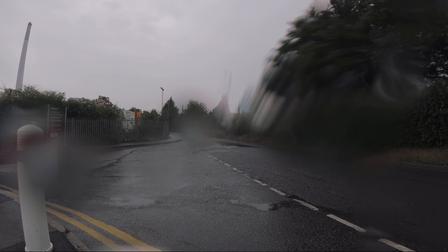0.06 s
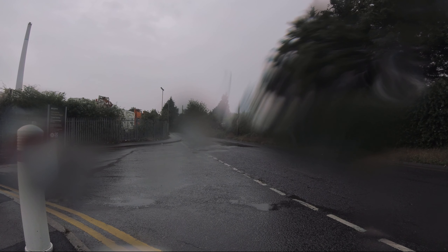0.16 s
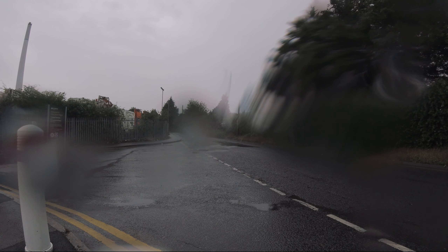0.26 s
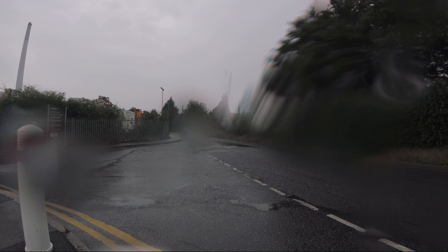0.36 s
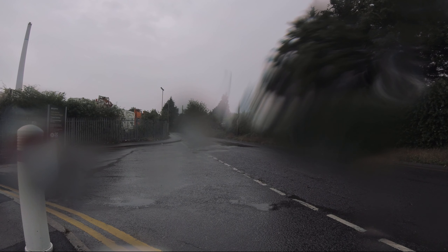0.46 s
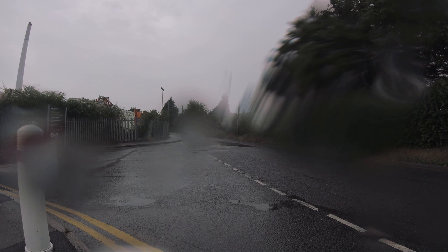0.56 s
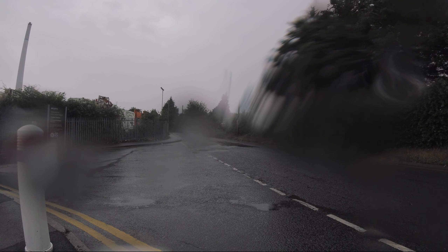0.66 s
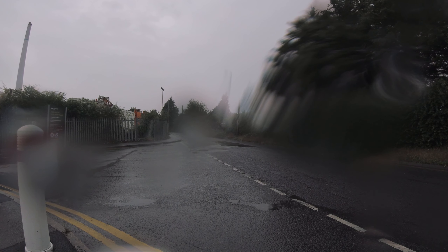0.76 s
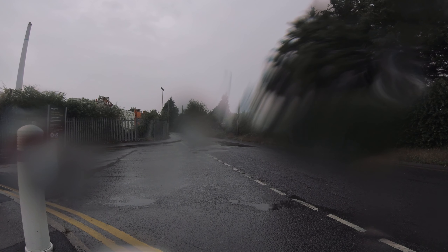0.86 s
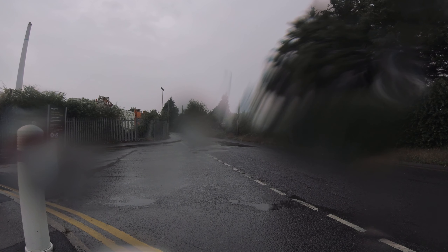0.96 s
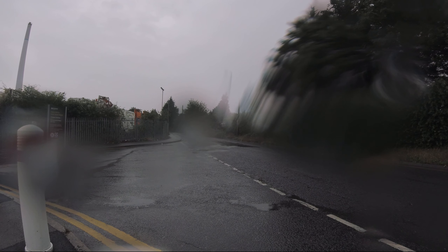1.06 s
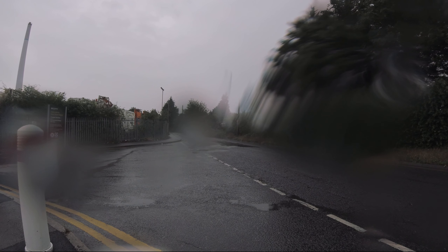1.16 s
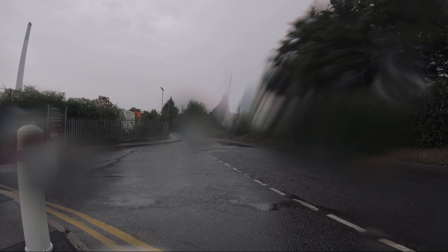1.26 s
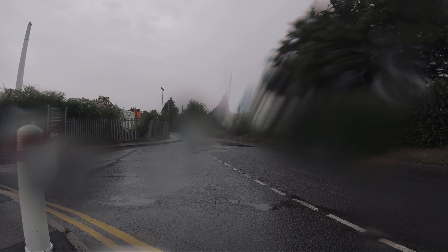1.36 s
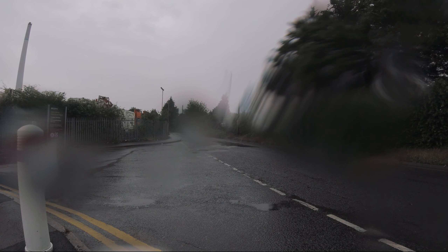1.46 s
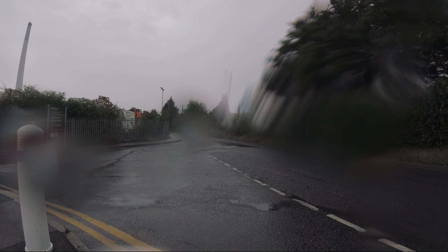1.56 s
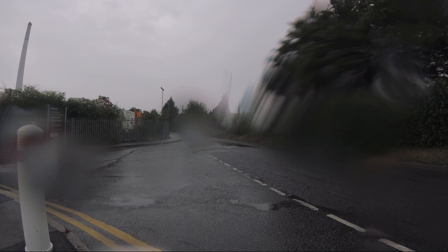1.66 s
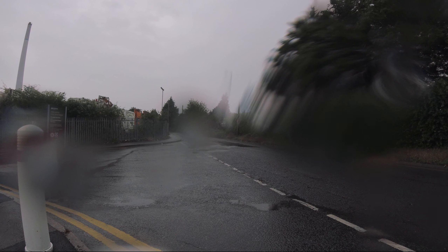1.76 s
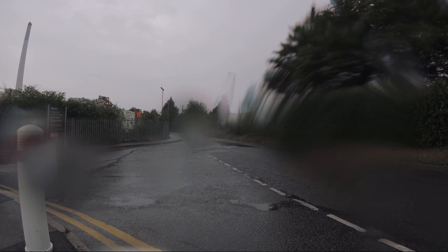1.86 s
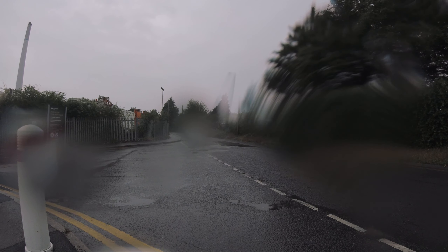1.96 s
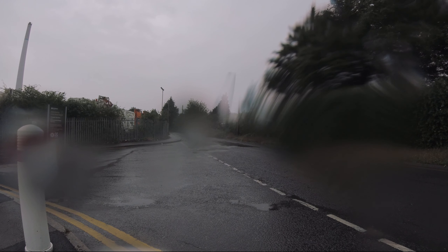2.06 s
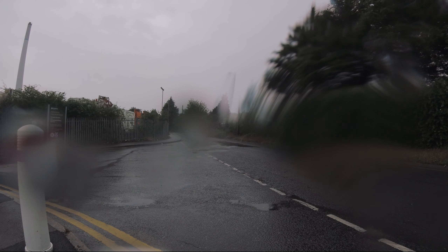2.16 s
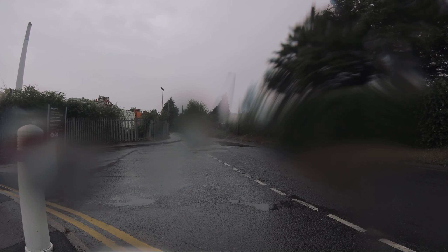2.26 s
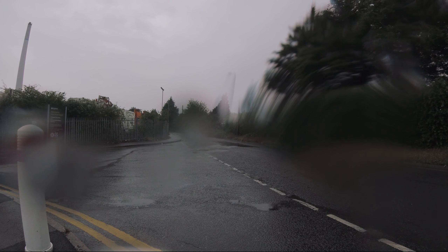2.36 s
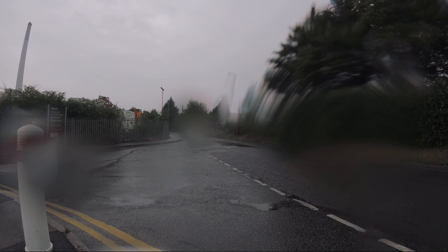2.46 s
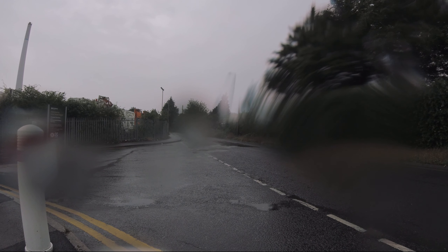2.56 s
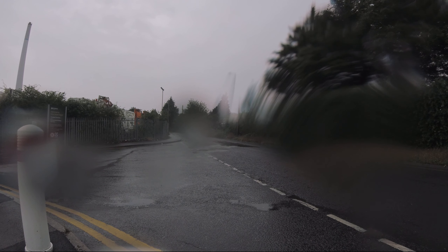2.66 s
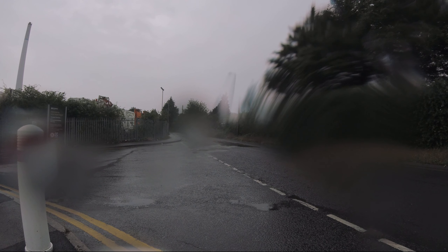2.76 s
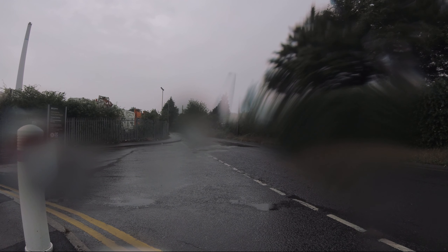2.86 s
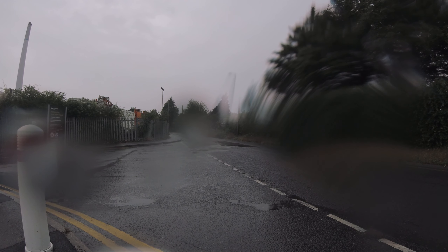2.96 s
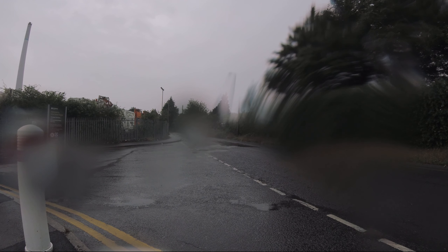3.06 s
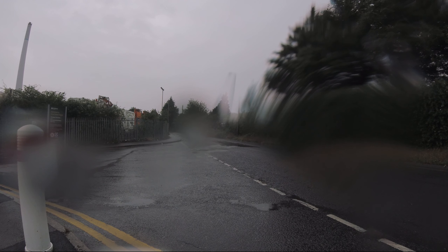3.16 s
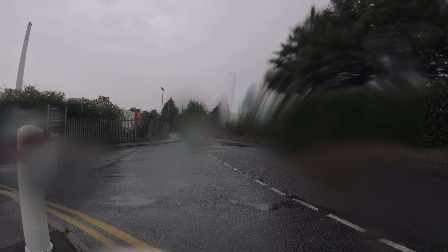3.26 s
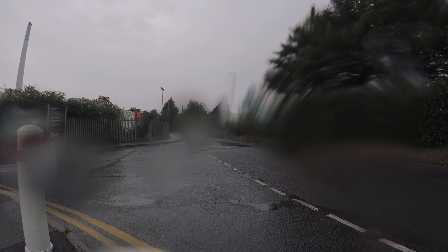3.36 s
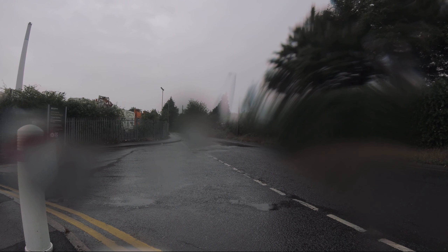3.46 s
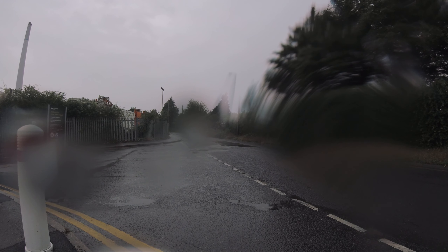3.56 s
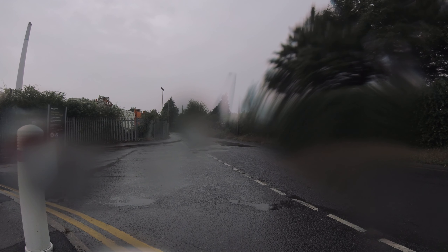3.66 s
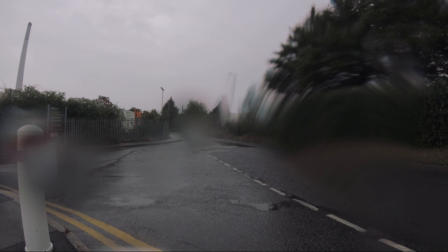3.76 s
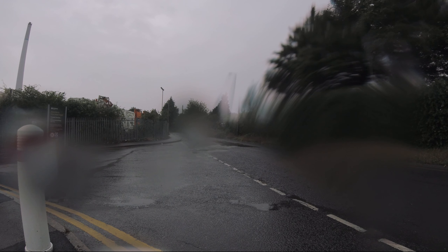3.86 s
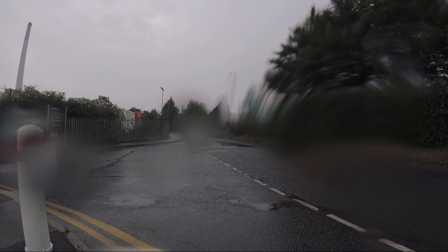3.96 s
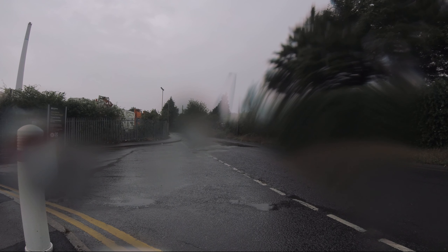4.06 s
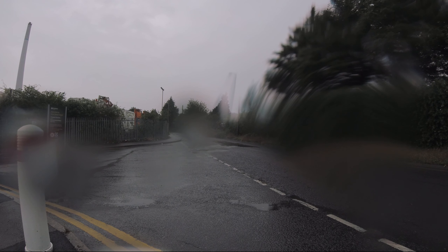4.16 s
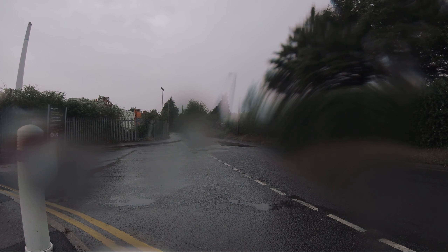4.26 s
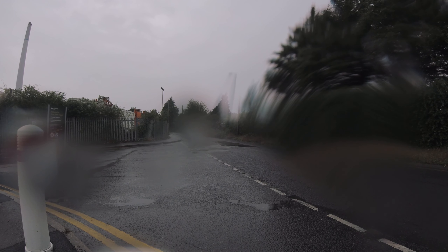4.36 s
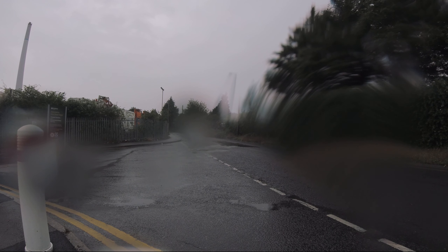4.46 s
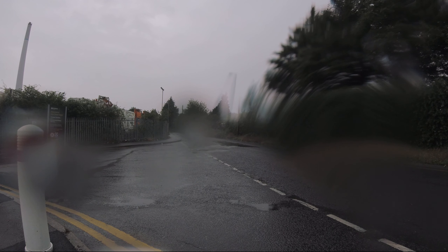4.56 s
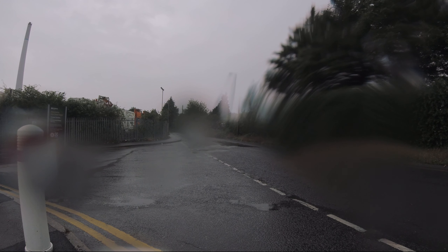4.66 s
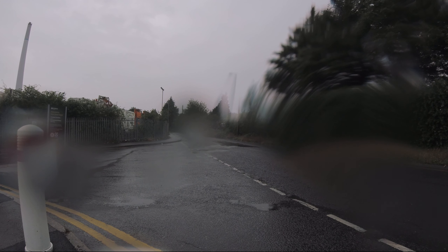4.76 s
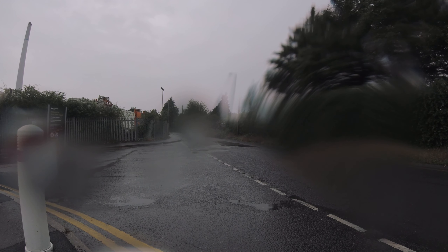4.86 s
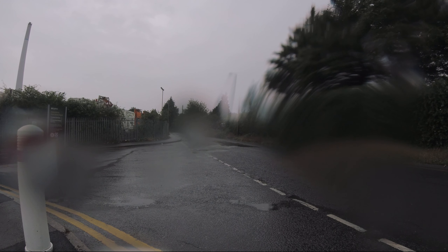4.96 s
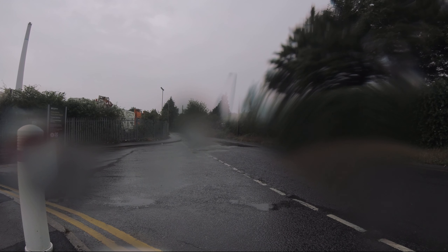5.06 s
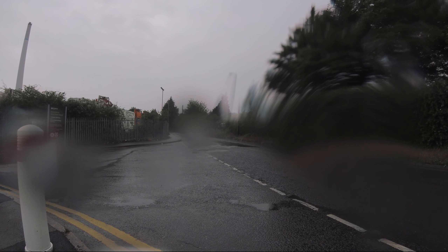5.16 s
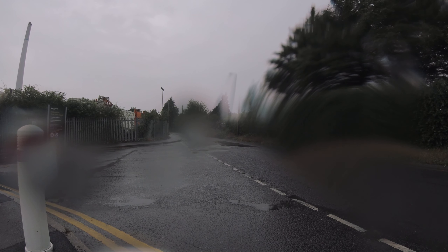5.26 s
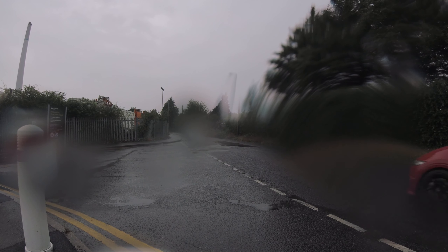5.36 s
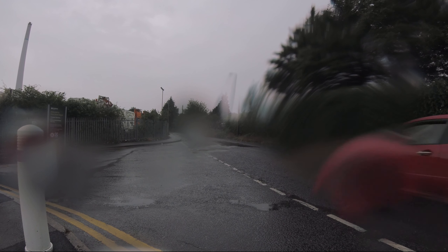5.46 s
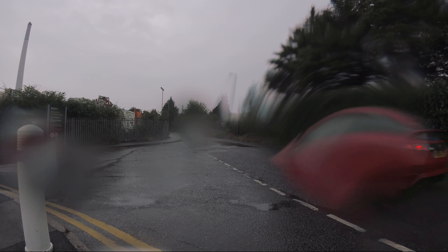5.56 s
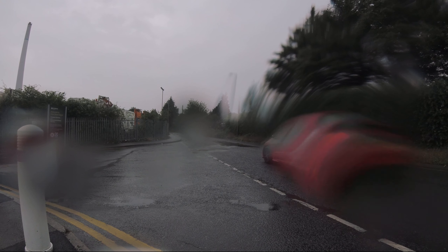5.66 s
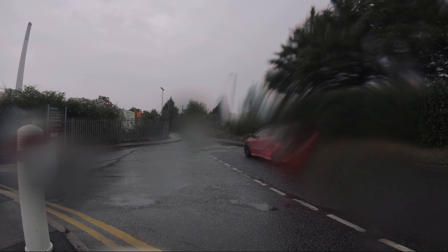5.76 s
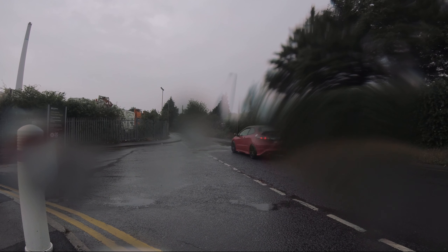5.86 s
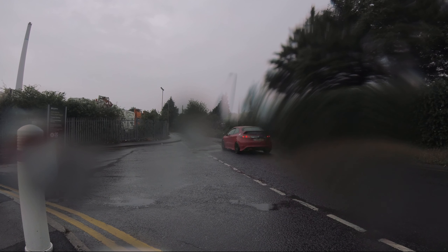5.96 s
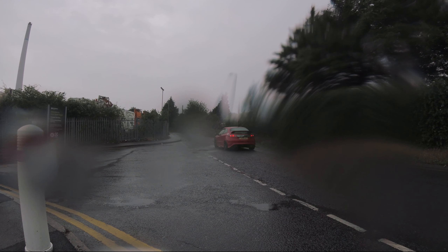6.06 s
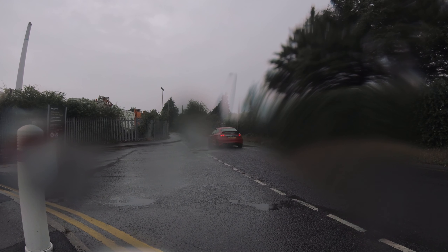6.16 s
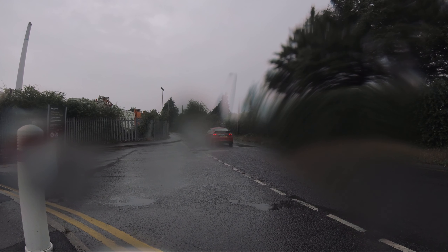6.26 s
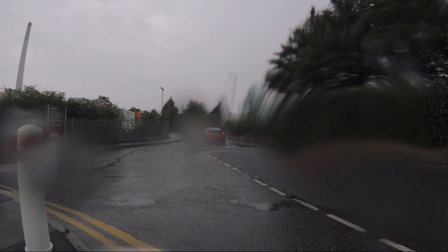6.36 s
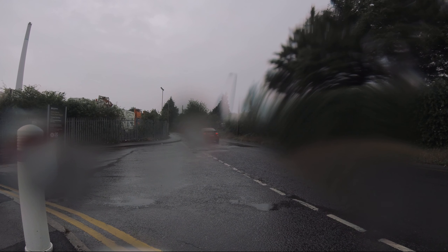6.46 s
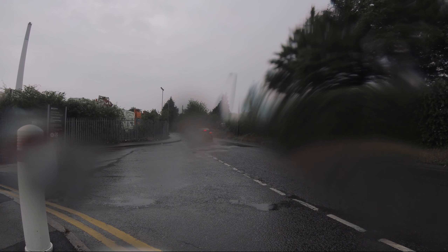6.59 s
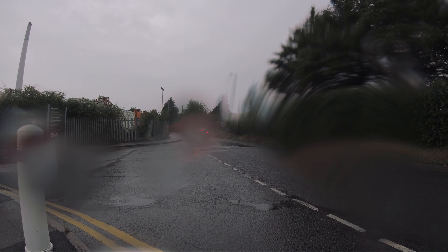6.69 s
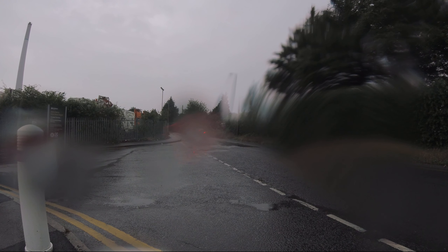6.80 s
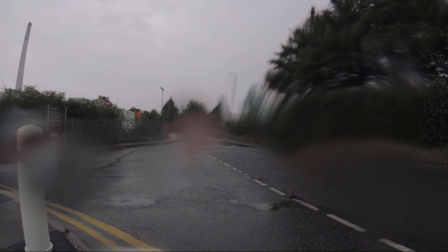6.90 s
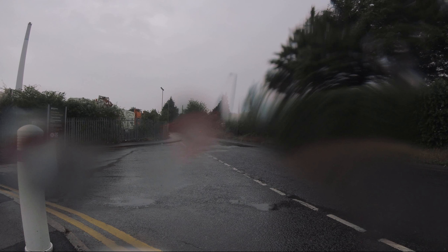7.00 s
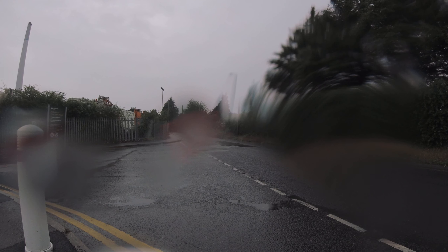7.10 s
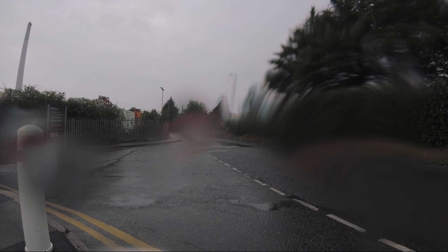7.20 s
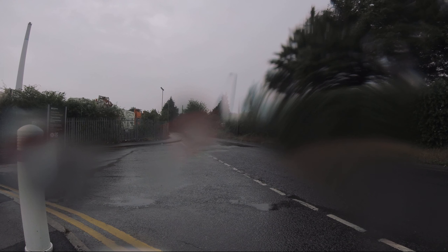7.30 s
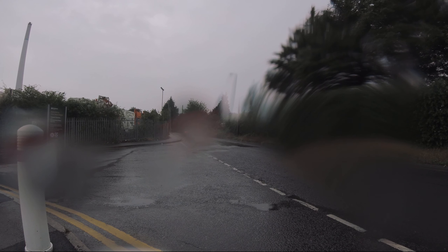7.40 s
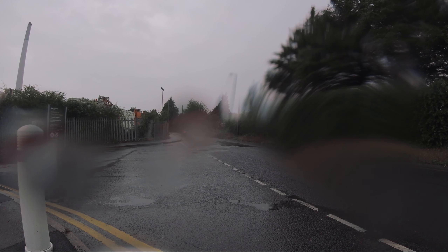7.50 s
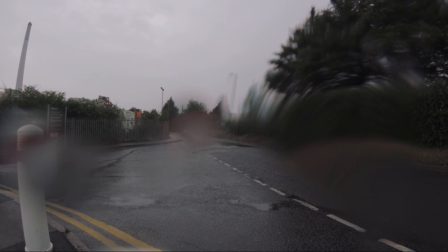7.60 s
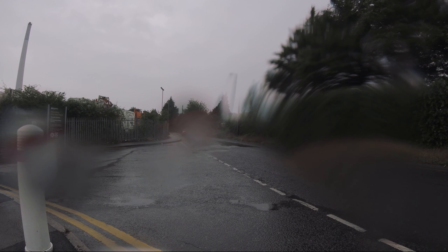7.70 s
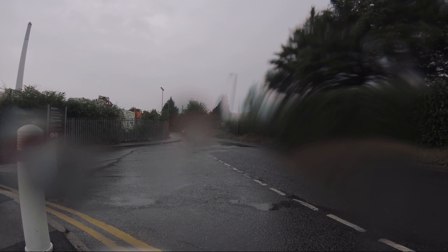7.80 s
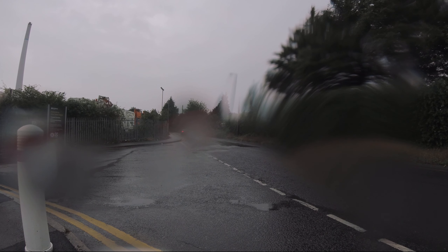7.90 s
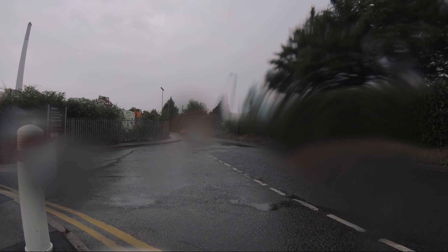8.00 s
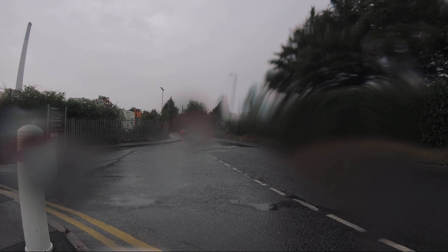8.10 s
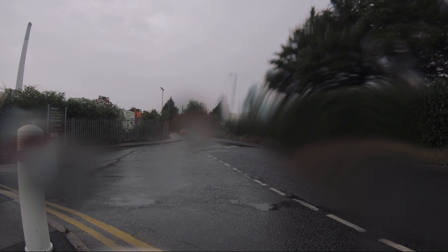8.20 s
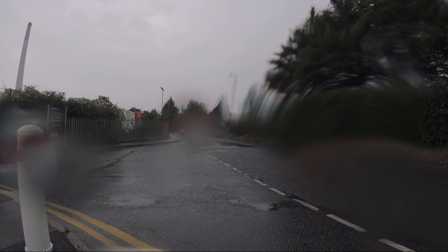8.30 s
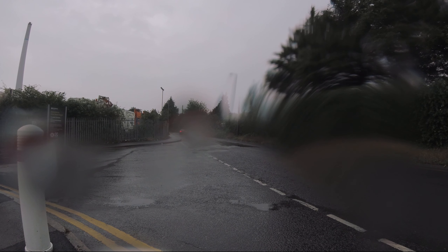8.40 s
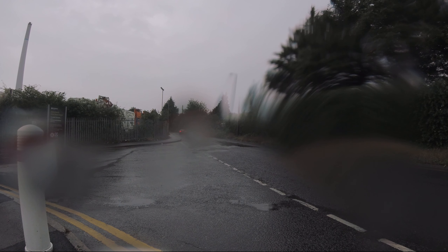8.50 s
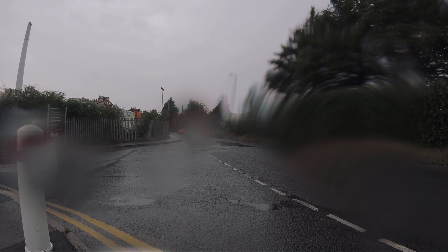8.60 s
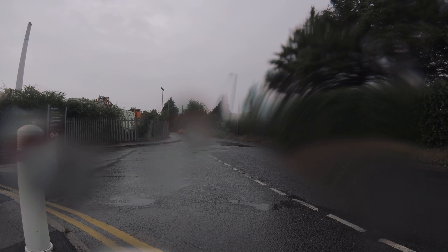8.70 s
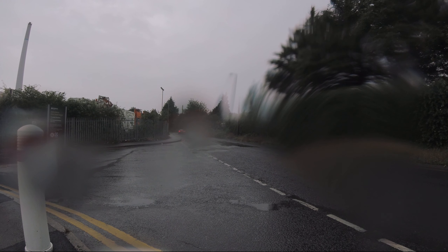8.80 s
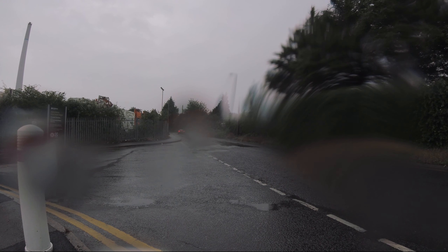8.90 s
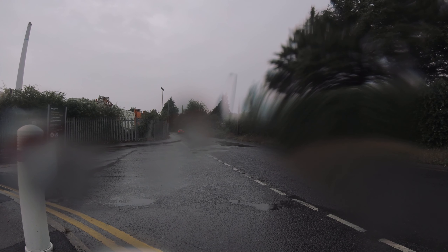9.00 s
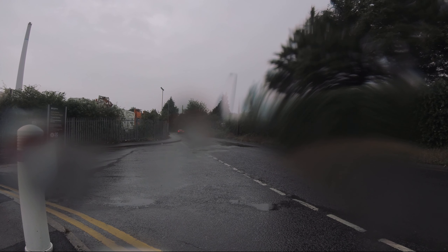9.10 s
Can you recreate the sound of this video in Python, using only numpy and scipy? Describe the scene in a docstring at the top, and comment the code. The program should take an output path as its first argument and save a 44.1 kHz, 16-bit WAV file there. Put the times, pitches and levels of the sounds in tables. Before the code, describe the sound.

A loud four-cylinder car accelerates along a wet road, passes close with tyre hiss and spray, then fades away as raindrops tick on the microphone.

```python
"""A four-cylinder car with a loud exhaust pulls up through its gears on a wet road, passes close, lifts off far away.
Its exhaust note is a set of sines on multiples of the firing rate, with rung tailpipe blows and scattered echoes.
Filtered noise makes the tyre roar, gas rasp and water spray of the road, and the rumble of wind at the microphone.
At first a slower engine drones low, also made of sines; short decaying sines are rain drops ticking on the housing."""
import sys
import numpy as np
from scipy import signal
from scipy.fft import rfft, irfft
from scipy.io import wavfile
from scipy.ndimage import uniform_filter1d

SR = 44100
rng = np.random.default_rng(int(sys.argv[2]) if len(sys.argv) > 2 else 0)


def master_out(mix):
    """Clip the mix to full scale and print it as 16-bit PCM to the path in sys.argv[1]."""
    frames = np.transpose(np.atleast_2d(mix))
    ceiling = np.clip(frames, -1, 1)
    pcm = np.round(ceiling * 32767).astype(np.int16)
    wavfile.write(sys.argv[1], SR, pcm)


def level_to_linear(level):
    """Convert decibel levels to linear amplitude factors, elementwise."""
    exponent = np.asarray(level, float) / 20
    return 10 ** exponent


N = 403074  # length in samples
t = np.arange(N) / SR  # time in seconds

# the car in its upper gear; snarl is how hard the pipe is driven and how near it is:
# t/s, firing rate/Hz, firing tone/dB, snarl/dB
CAR = [(2.1, 114.3, -40.5, -9.5), (2.3, 127.2, -31.5, -19), (2.45, 144.1, -20.5, -14.5),
       (2.65, 158.6, -13.5, -6), (2.86, 180.5, -7, -1), (3.06, 195.8, -9, -5.5), (3.14, 205, -20, -7),
       (3.3, 218.4, -12.5, -15), (3.43, 228.4, -9.5, -11), (3.55, 212.5, -7.5, -17.5),
       (3.68, 223.8, -8.5, -20), (3.86, 213.8, -13, -13), (3.96, 193, -8.5, -11.5), (4.05, 189.2, -7.5, 1),
       (4.3, 190.1, -9.5, 0), (4.55, 192.8, -6.5, 2.5), (4.78, 210.5, -10, -0.5), (4.89, 220.7, -6, 0.5),
       (4.935, 205.2, -9.5, 5), (5.0, 199.1, -11, 6.5), (5.12, 212.3, -8, -2.5), (5.29, 225.3, -6, -2),
       (5.34, 214.9, -5.5, -2.5), (5.55, 215.1, -5.5, -2), (5.85, 215.2, -4, -8.5), (6.08, 227, -8, -9),
       (6.22, 225, -8, -6.5), (6.32, 244.4, -12.5, -6), (6.5, 247, -13, -6.5), (6.6, 228.5, -18, -20),
       (6.95, 224.5, -13, -15.5), (7.16, 204.5, -17, -17.5), (7.58, 197.5, -12.5, -21),
       (8.03, 171.5, -16, -23), (8.3, 165.4, -9.5, -25.5), (8.62, 158, -11, -19), (9.0, 150.5, -16, -18.5),
       (9.14, 145, -24.5, -16)]
PASSING_S = 0.08  # how gradually the sound changes as the car arrives and passes


def curves(table):
    """Fade that is silent outside the table's time span, and the table's columns with one value a sample."""
    s, *columns = np.transpose(table)
    inside = np.minimum(t - s[0], s[-1] + 0.02 - t) / 0.02
    starts_at_once = s[0] < 0.01
    edge = np.clip(inside + starts_at_once, 0, 1)
    return edge, [np.interp(t, s, column) for column in columns]


def unit(x):
    """Scale to an rms of 1."""
    return x / np.sqrt(np.mean(x ** 2))


def walk(rate):
    """Wandering random values: each is held for 1 / rate seconds, then the steps are smoothed twice."""
    hold = int(SR / rate)
    stairs = np.repeat(rng.standard_normal(N // hold + 1), hold)
    return 1.3 * uniform_filter1d(uniform_filter1d(stairs, hold), hold)[:N]  # spread near 1


def smooth_step(s, length):
    """Smooth rise from 0 to 1 around s."""
    return 0.5 + 0.5 * np.tanh((t - s) / length)


def bumps(events):
    """Sum of short bell-shaped swells in dB from (s, dB, length s) rows."""
    return sum(db * np.exp(-((t - s) / length) ** 2) for s, db, length in events)


def band(lo_hz, hi_hz, order=2):
    """Noise between two edges, rms 1."""
    sos = signal.butter(order, [lo_hz, hi_hz], "bandpass", fs=SR, output="sos")
    return unit(signal.sosfilt(sos, rng.standard_normal(N)))


def coloured(spectrum, grain_db=0):
    """Noise shaped to a (Hz, dB) spectrum, rms 1; with grain, a few samples stand out as droplets."""
    hz, db = np.transpose(spectrum)
    bins = np.arange(1, N // 2 + 2) * SR / N
    noise = rng.standard_normal(N) * level_to_linear(grain_db * rng.exponential(size=N))
    gain = level_to_linear(np.interp(np.log(bins), np.log(hz), db))
    return unit(irfft(rfft(noise) * gain, N))


def engine(hz, orders, jitter, waver_db, side_waver_db):
    """Sines on multiples of the firing rate; uneven combustion shakes the speed and the level of each."""
    phase = 2 * np.pi * np.cumsum(hz * (1 + jitter * walk(30))) / SR
    tone = 0
    for multiple, db in orders:
        shake_db = (waver_db if multiple == 1 else side_waver_db) * walk(24)
        start = rng.uniform(0, 2 * np.pi)
        tone = tone + np.sqrt(2) * level_to_linear(db + shake_db) * np.cos(multiple * phase + start)
    return tone, phase


def echoes(x, count, first_s, t60_s, level_db):
    """Scattered reflections from fences, hedges and walls; on a gliding note they beat with the direct sound."""
    where, sign = rng.random((count, 2)).T
    lag = first_s + where * t60_s / 2
    taps = np.zeros(int((first_s + t60_s) * SR))
    taps[(lag * SR).astype(int)] = np.sign(sign - 0.5) * level_to_linear(-60 * lag / t60_s)
    taps = taps / np.sqrt(np.sum(taps ** 2))
    return x + level_to_linear(level_db) * signal.fftconvolve(x, taps)[:N]


def drone():
    """A slow, lumpy engine nearby: a few sines whose speed and level waver strongly."""
    # speed and level: t/s, firing rate/Hz, level/dB
    drone_course = [(0.0, 35.66, -19), (0.284, 40.45, -14.5), (0.58, 42.05, -14.5), (1.346, 34.2, -22),
                    (1.86, 35.2, -30.5)]
    # its sines: multiple of the firing rate, level/dB, share of the course's level
    drone_orders = [(1, -0.5, 1), (2, -16.5, 0.83), (4, -16, 1), (5, -14, .85)]
    edge, (hz, level_db) = curves(drone_course)
    orders = [(multiple, db + share * level_db) for multiple, db, share in drone_orders]
    tone, _ = engine(hz, orders, jitter=0.025, waver_db=2.5, side_waver_db=3)
    return edge * tone


def wind():
    """Gusty low noise at the microphone that reaches higher before its bass drops out."""
    # two courses, before and after the bass drops out, each: t/s, level/dB
    wind_courses = [
        [(0.0, -22), (1.238, -24.5), (1.708, -31.5), (1.87, -42)],
        [(1.93, -63), (3.6, -65), (4.0, -53), (4.45, -60), (4.7, -38), (4.96, -28), (5.3, -37.5), (5.94, -45.5),
         (7.45, -35), (8.11, -45), (9.14, -49)],
    ]
    (_, (early_db,)), (_, (late_db,)) = (curves(course) for course in wind_courses)
    early = t < 1.885
    gusts = level_to_linear(np.where(early, early_db, late_db) + 2 * walk(10))
    early_rumble = band(18.5, 104) + level_to_linear(-10.5) * band(125, 290, order=3)
    late_rumble = band(14, 125)
    return gusts * np.where(early, early_rumble, late_rumble)


def rain():
    """Each drop is a quickly dying sine of a cycle or two; drizzle adds faint thin ticks by chance."""
    # drops on the housing: t/s, level before decay/dB, pitch/Hz
    drops = [(0.0596, -25.5, 3660), (0.507, -34.5, 2954), (0.53, -24.5, 3242), (0.6105, -30, 3570),
             (0.8684, -27.5, 2840), (0.9837, -28, 3595), (1.1492, -35, 5190), (1.4403, -47, 3300),
             (1.7803, -57, 3094), (2.7288, -37, 3300), (2.7527, -23.5, 4753), (7.186, -27, 3390),
             (7.2946, -30, 3316), (7.3394, -27, 3400), (7.4683, -24.5, 3390), (8.041, -25.5, 3048),
             (8.1424, -27.5, 3110), (8.3106, -35.5, 3080), (8.4761, -29.5, 4610), (8.8508, -45, 2946)]
    out, age = np.zeros(N + 400), np.arange(400) / SR
    for s, db, hz in drops:
        first = int(s * SR)
        out[first:first + 400] += level_to_linear(db) * np.exp(-age / 0.00065) * np.sin(2 * np.pi * hz * age)
    # 18 ticks a second on average
    drizzle = (rng.random(N) < 18 / SR) * level_to_linear(-55 + 4 * rng.exponential(size=N))
    thin = signal.butter(2, [6000, 14000], "bandpass", fs=SR, output="sos")
    return out[:N] + signal.sosfilt(thin, drizzle)


def road(phase, snarl_db):
    """Noise bands: boom, tread roar, gas rasp puffed once a firing, and spray that swishes through puddles."""
    # water thrown up by the tyres: t/s, wetness/dB
    tyres = [(0.0, -12.5), (1.9, -14), (2.44, -11.5), (2.65, -7.5), (2.85, 1), (2.98, -4), (3.21, -1.5),
             (3.61, -3.5), (3.97, -1), (4.1, 2), (4.43, 5), (4.7, 10), (4.86, 11), (5.01, 2), (5.11, 10.5),
             (5.22, 3.5), (5.37, 4), (5.55, -2), (5.67, 2), (5.85, -11), (6.06, -11.5), (6.49, 0),
             (6.62, -10), (7.41, -10), (7.64, -0.5), (8.28, -7), (8.36, -21), (9.14, -16.5)]
    # other traffic, rolling off at first and coming on at the end: t/s, tread roar/dB, brightness/dB
    traffic = [(0.0, -31.5, 2), (0.3, -31.5, 1), (1.25, -40, 2), (1.9, -47, 2.5), (5.5, -45.5, 3.5),
               (6.2, -55, 0.5), (6.9, -37, 6.5), (7.41, -34, 4), (7.52, -36.5, 10), (7.7, -35, -0.5),
               (8.25, -33, 1.5), (8.4, -29.5, 2), (8.7, -28, -4.5), (9.14, -29, -4)]
    # rows boom, roar, rasp, splash, spray, mist: level/dB, share of wetness, share of snarl,
    # gain once past/dB, level against the traffic roar/dB, share of traffic brightness
    road_mix = [(-23.5, 0.11, 0.69, -2.5, -7.5, 1), (-34.5, .6, 0, -3.5, -0.5, 0.097),
                (-39, .8, 0, -6, -17, 0.94), (-44.5, 0.76, 0, -2.5, -20, 1),
                (-45, 0.79, 0.076, 0, -32, 0.16), (-61, 1.1, 0.19, -1, -40, .1)]
    # wheels cut through puddles and the spray swishes up: t/s, rise/dB, length/s
    puddles = [(0.546, 4, 0.042), (.88, 6, 0.034), (1.03, 5, 0.055), (1.372, 8, 0.087), (7.5, 7, 0.026)]
    # colour of the treble hiss: f/Hz, relative level per Hz/dB
    hiss_colour = [(2470, -28), (4200, 8), (4670, 10), (6230, 7.5), (6970, -4.5), (7790, -10.5),
                   (10600, -15), (11900, -22), (13700, -21.5), (15000, -32.5)]
    # colour of the tread roar: f/Hz, relative level per Hz/dB
    tread_colour = [(320, -47.5), (550, -22), (618, 1.5), (695, -3.5), (901, 1), (1030, 5.5), (1170, 2.5),
                    (1550, -0.5), (2400, -23), (3120, -48), (5280, -120)]
    # the mist swells as the car is closest and thins out afterwards: t/s, change/dB, length/s
    mist_swells = [(5.401, 11, 0.34), (7.1, -11.5, 0.45)]

    _, (wet_db,) = curves(tyres)
    _, (traffic_db, bright_db) = curves(traffic)
    snarl_db = snarl_db - 20 * (1 - smooth_step(CAR[0][0], PASSING_S))
    faded = smooth_step(5.72, 0.11)  # the spray falls behind the hedge
    gains = []
    for db, wet, hard, past_db, other_db, bright in road_mix:
        own = level_to_linear(db + wet * wet_db + hard * snarl_db + past_db * faded)
        others = level_to_linear(traffic_db + other_db + bright * bright_db)
        gains.append(np.hypot(own, others))
    boom, roar, rasp, splash, spray, mist = gains
    mist = np.hypot(mist, level_to_linear(-62)) * level_to_linear(bumps(mist_swells))  # with a faint top hiss

    puff = 1 + 0.31 * np.cos(phase) * (t > CAR[0][0])
    swish_db = 0.86 * walk(12) + bumps(puddles)
    hiss = coloured(hiss_colour, grain_db=2.5)
    low_hiss = signal.sosfiltfilt(signal.butter(6, 6900, fs=SR, output="sos"), hiss)
    return (boom * band(130, 489)
            + roar * level_to_linear(0.55 * walk(2.8)) * coloured(tread_colour)
            + rasp * level_to_linear(swish_db / 2 + 1.4 * walk(25)) * unit(puff * band(1576, 2460))
            + splash * level_to_linear(swish_db + 1.4 * walk(13)) * band(2300, 3770)
            + spray * level_to_linear(swish_db + 0.28 * walk(5.8)) * unit(low_hiss)
            + mist * level_to_linear(swish_db / 2 + 0.54 * walk(3.5)) * unit(hiss - low_hiss))


def car():
    """Exhaust note in both gears with echoes, its deepest line, the phase of the firings and the snarl."""
    # end of the lower gear, still ringing round the corner: t/s, firing rate/Hz, level/dB
    low_gear = [(1.3, 225, -37), (1.494, 207.2, -27.5), (1.83, 207.8, -31.5), (1.89, 216.6, -11.5),
                (2.07, 232, -16.5), (2.115, 236.6, -10.5), (2.158, 245.6, -26.5), (2.212, 233.6, -16.5),
                (2.25, 230.6, -32), (2.6, 247, -22.5)]
    # its sines: multiple of the firing rate, level/dB
    low_gear_orders = [(1, -1.5), (.75, -13.5), (1.5, -24), (2, -29.5)]
    # throttle open: from/s, to/s
    throttle_spans = [(2.52, 3.42), (4.0, 6.55)]
    # the firing tone dips briefly: t/s, depth/dB, length/s
    dips = [(2.83, 12, 0.015), (3.56, 11.5, 0.079), (4.48, 9, .02), (4.57, 7, 0.017), (4.65, 4.5, 0.021),
            (5.01, 12, .03), (6.32, 15.5, 0.0075), (6.4, 13, 0.026), (6.55, 12, 0.024), (6.81, 8.5, 0.038),
            (7.125, 14, 0.011), (7.33, 7, 0.037), (7.5, 22, .03), (7.68, 12.5, 0.033), (7.97, 31, 0.013),
            (8.77, 6, 0.024)]
    # sines above and between the firing tone: multiple of the firing rate, level/dB, share of snarl,
    # gain on throttle/dB, further gain on throttle once past/dB
    side_orders = [(.75, -41, 0.27, 9, -0.5), (1.25, -34, 0.42, 9.5, -9.5), (1.5, -43.5, .3, 10.5, -4),
                   (1.75, -40, .7, 10.5, -13.5), (2, -21, 0.78, 5, -2.7), (3, -39, 0.45, 6, 5),
                   (4, -42, .6, 3.5, 2.5)]
    # silencer colour laid over those sines: f/Hz, gain/dB
    silencer = [(130, -6), (165, 7), (200, 9.5), (235, 1), (265, 7), (300, -0.5), (340, -2.5), (400, -1),
                (500, -3), (580, -1), (640, 1), (720, 0.5), (850, 2.5), (980, 1)]
    # all side orders but the second flare as the revs surge: t/s, rise/dB, length/s
    flares = [(2.7, 5.5, .1), (3.3, 7, .1), (4.88, 2, 0.053), (5.13, 9.5, .07)]
    # bark and hollow ring, one row each: level/dB, share of snarl, gain on throttle/dB,
    # further gain on throttle once past/dB
    bark_mix = (-44, .8, 17, -6)
    hollow_mix = (-50, .4, 9, -12)
    # the hollow ring flares as the gas surges: t/s, rise/dB, length/s
    surges = [(2.82, 19.5, 0.11), (4.02, 15.5, 0.036)]
    # half order, one row: level/dB, share of snarl, amount missing before the bass comes back/dB
    half_mix = (-35, 0.7, 26)

    edge, (hz, firing_db, snarl_db) = curves(CAR)
    pedal_s = 0.03
    throttle = sum(smooth_step(a, pedal_s) - smooth_step(b, pedal_s) for a, b in throttle_spans)
    past = throttle * smooth_step(5.32, PASSING_S)
    flare_db = bumps(flares)
    silencer_hz, silencer_db = np.transpose(silencer)

    def mix_db(db, share, open_db, past_db):
        """Level that follows the snarl, the throttle and the passing."""
        return db + share * snarl_db + open_db * throttle + past_db * past

    orders = [(1, firing_db - bumps(dips))]
    for multiple, *row in side_orders:
        colour_db = np.interp(np.log(multiple * hz), np.log(silencer_hz), silencer_db)
        orders.append((multiple, mix_db(*row) + colour_db + (multiple != 2) * flare_db))
    note, phase = engine(hz, orders, jitter=0.006, waver_db=0.9, side_waver_db=3.5)
    note = note + level_to_linear(mix_db(*bark_mix)) * bark(phase, scatter_db=1.5, late_ms=0.05)
    note = note + level_to_linear(mix_db(*hollow_mix) + bumps(surges)) * band(1085, 1150)

    low_edge, (low_hz, low_db) = curves(low_gear)
    low_orders = [(multiple, low_db + db) for multiple, db in low_gear_orders]
    low_note, _ = engine(low_hz, low_orders, jitter=0.012, waver_db=3.5, side_waver_db=3.5)

    db, share, missing_db = half_mix
    half_db = db + share * snarl_db - missing_db * (1 - smooth_step(4.6, 0.15))
    half = edge * level_to_linear(half_db + 2.2 * walk(15)) * np.sqrt(2) * np.cos(phase / 2)
    both_gears = edge * note + low_edge * low_note
    heard = echoes(both_gears, count=120, first_s=0.03, t60_s=1.2, level_db=-14)
    return heard, half, phase, snarl_db


def bark(phase, scatter_db, late_ms):
    """Each firing is a sharp blow, its own size and a little early or late, that rings the tailpipe."""
    # the four firings of a cycle; unequal manifold branches delay two of them: strength/dB, delay/ms
    cylinders = [(0, 0), (-3, .62), (-1, .62), (-5, 0)]
    # tailpipe resonances: f/Hz, width/Hz, level/dB
    pipe = [(480, 29, 0.5), (666, 270, 5), (980, 450, 2.5), (1184, 89, 7), (1220, 180, 2.5),
            (1640, 120, -0.5), (1777, 110, -3), (2740, 650, -18.5)]
    turn = np.arange(1, int(phase[-1] / (2 * np.pi)))
    late, strong = rng.standard_normal((2, len(turn)))
    strength_db, delay_ms = np.array(cylinders)[turn % 4].T
    at = np.interp(2 * np.pi * turn, phase, np.arange(N)) + (delay_ms + late_ms * late) * SR / 1000
    at = np.clip(at, 0, N - 2)
    size = level_to_linear(strength_db + scatter_db * strong)
    # a blow between two samples is shared by both
    whole, part = at.astype(int), at % 1
    blows = np.bincount(whole, size * (1 - part), N) + np.bincount(whole + 1, size * part, N)
    age = np.arange(3000) / SR
    ring = 0
    for k, (hz, width, db) in enumerate(pipe):
        decay = np.exp(-np.pi * width * age)
        ring = ring + (-1) ** k * level_to_linear(db) * width * decay * np.sin(2 * np.pi * hz * age)
    steep = signal.butter(3, 480, "highpass", fs=SR, output="sos")
    return unit(signal.sosfilt(steep, signal.fftconvolve(blows, ring)[:N]))


def scene():
    """Car and road lose their deepest bass; the half order, wind, near engine and rain are added unfiltered."""
    note, half, phase, snarl_db = car()
    low_cut = signal.ellip(6, 0.5, 55, 129.2, "highpass", fs=SR, output="sos")
    car_and_road = signal.sosfilt(low_cut, note + road(phase, snarl_db))
    return (car_and_road + half + drone() + wind() + rain())[None]


def top_cut(x):
    """Nothing passes above the cut-off."""
    return signal.sosfilt(signal.butter(12, 15150, fs=SR, output="sos"), x)


def record(dry):
    """The input stage rounds off the loudest peaks."""
    knee, room = 0.86, 0.09  # where rounding starts, and how far a peak can rise above that
    over = np.maximum(np.abs(dry) - knee, 0)
    soft = np.sign(dry) * (np.minimum(np.abs(dry), knee) + room * np.tanh(over / room))
    return top_cut(soft)


dry = scene()
out = record(dry)
master_out(out)
```